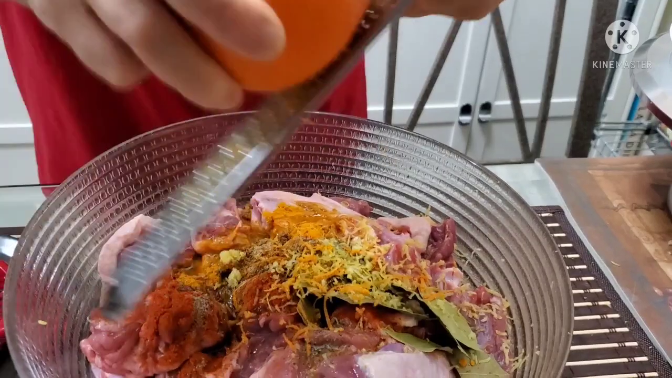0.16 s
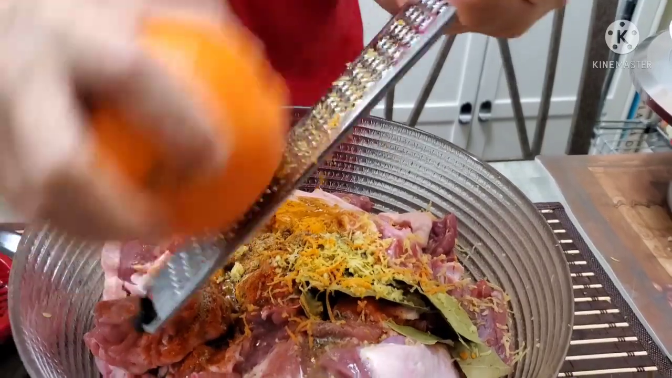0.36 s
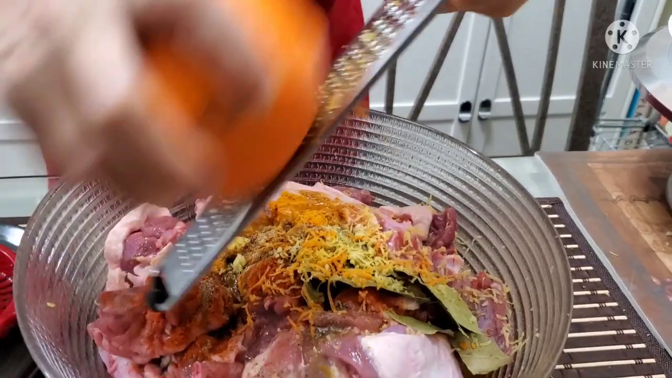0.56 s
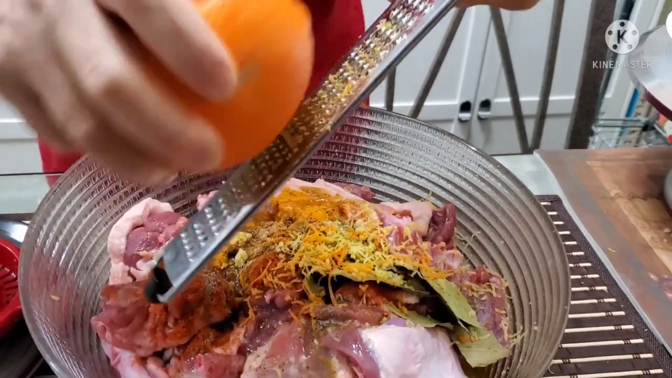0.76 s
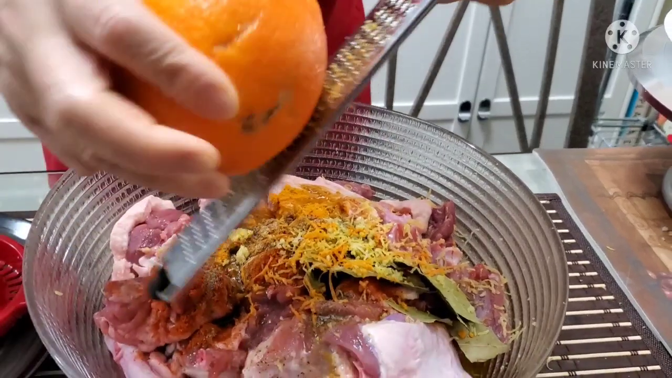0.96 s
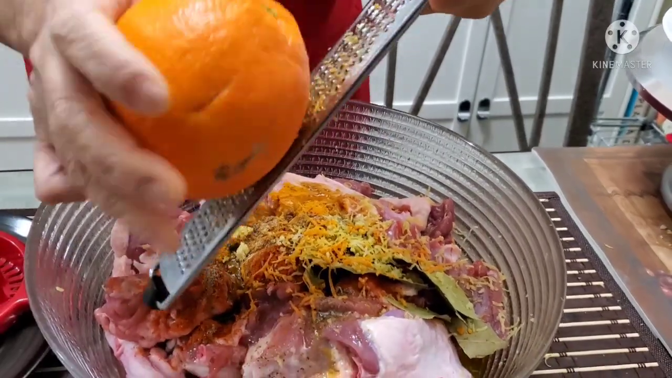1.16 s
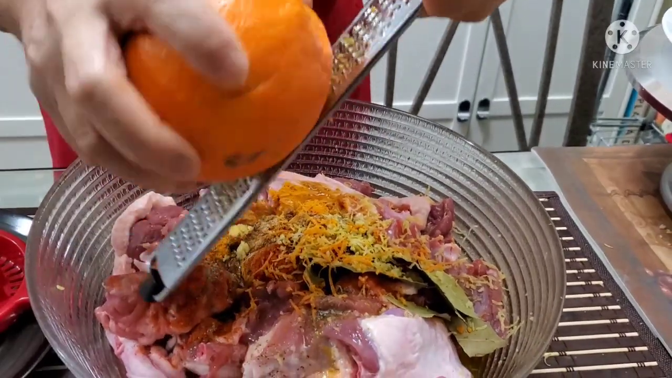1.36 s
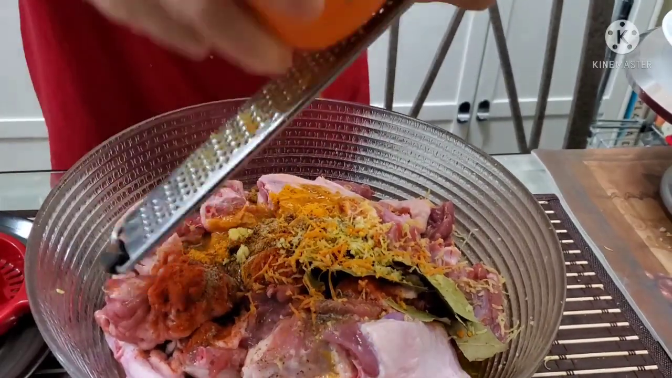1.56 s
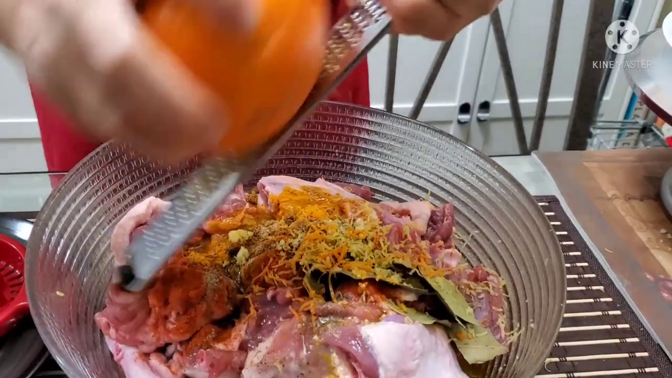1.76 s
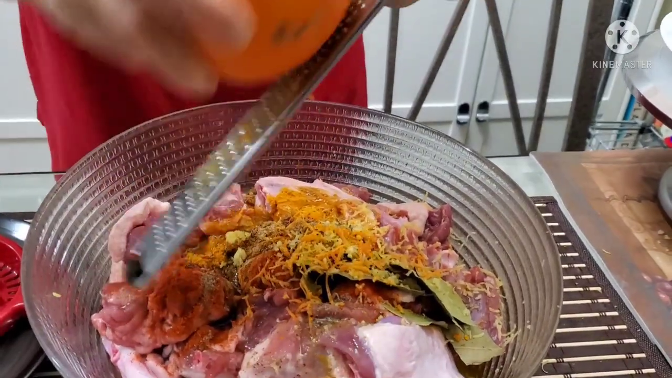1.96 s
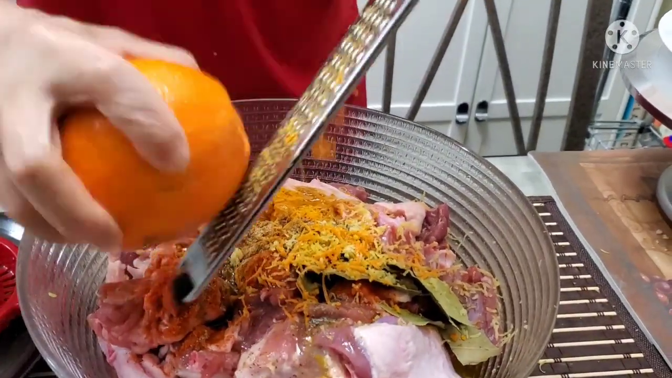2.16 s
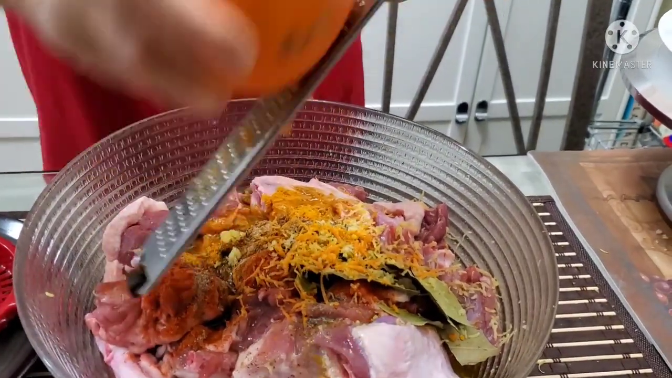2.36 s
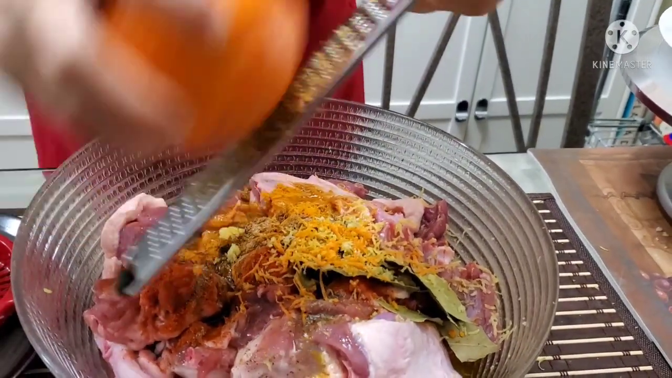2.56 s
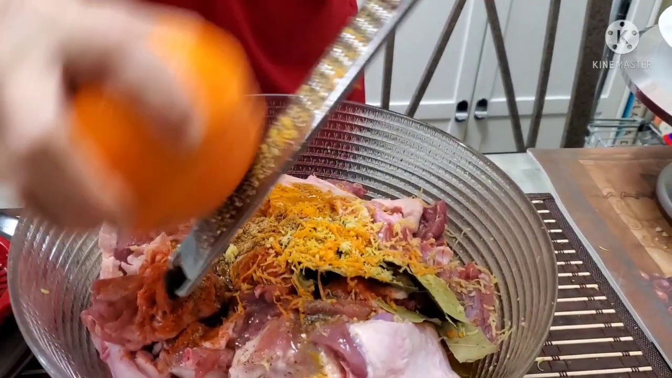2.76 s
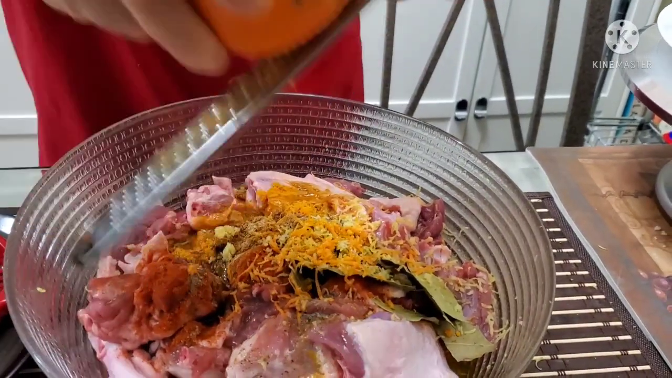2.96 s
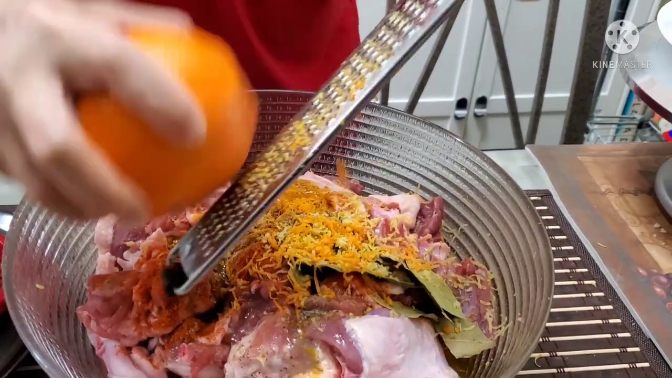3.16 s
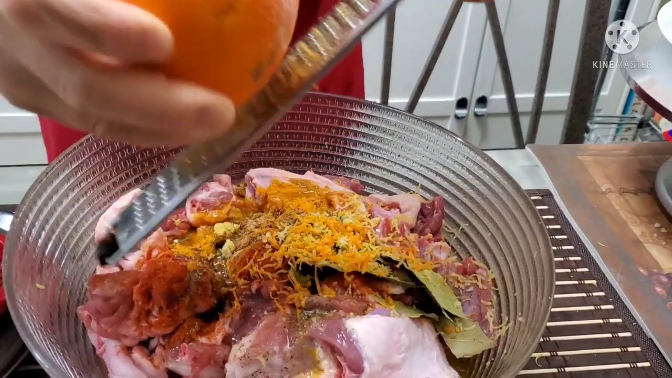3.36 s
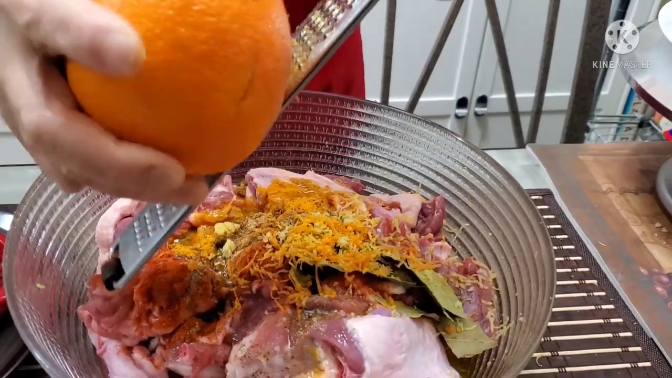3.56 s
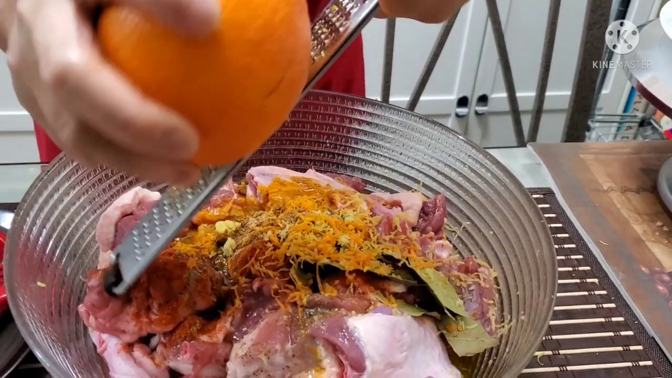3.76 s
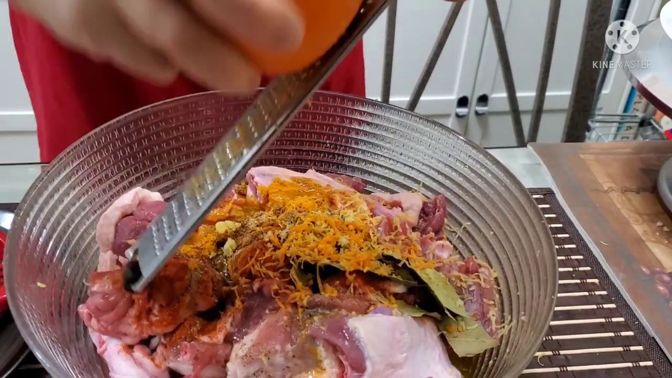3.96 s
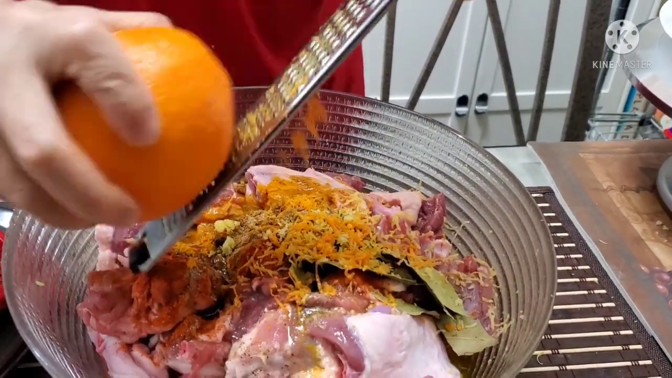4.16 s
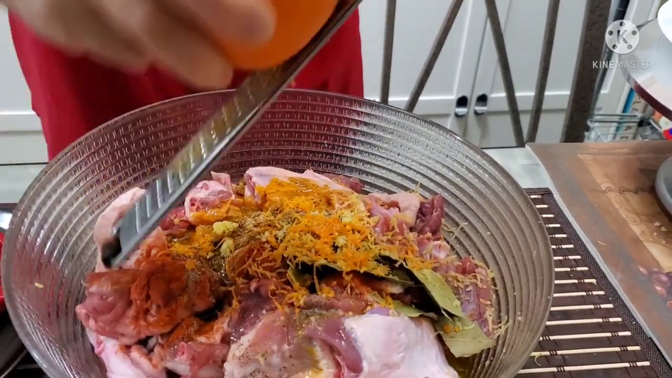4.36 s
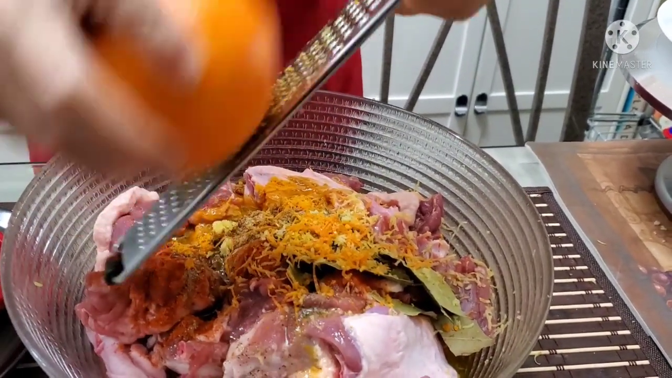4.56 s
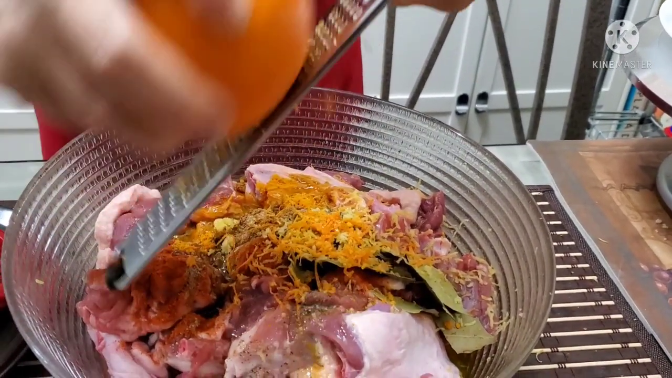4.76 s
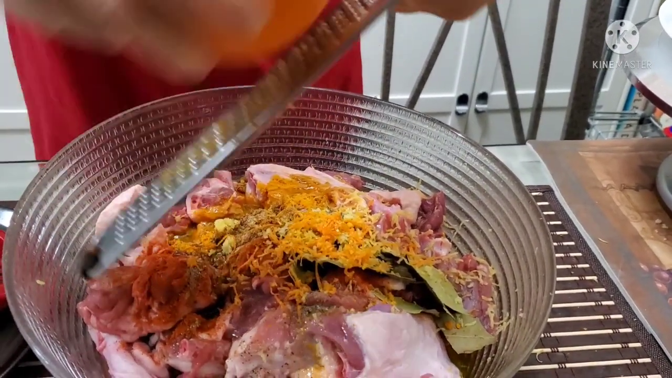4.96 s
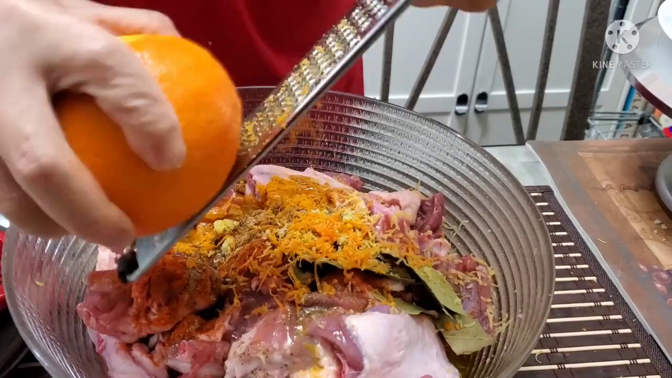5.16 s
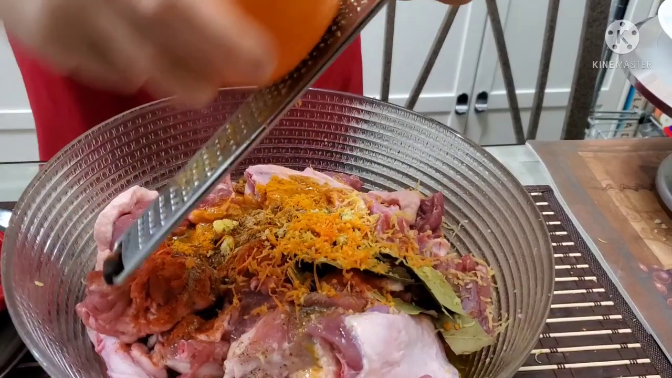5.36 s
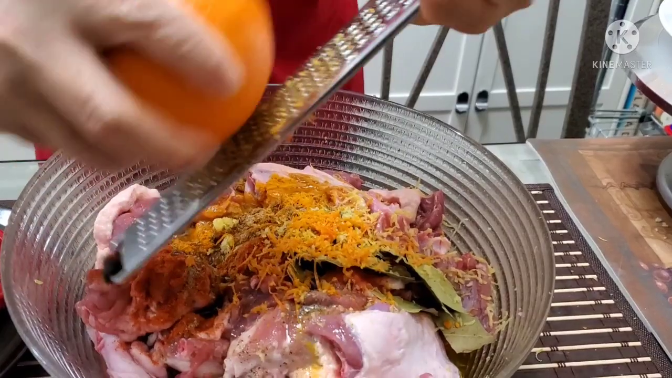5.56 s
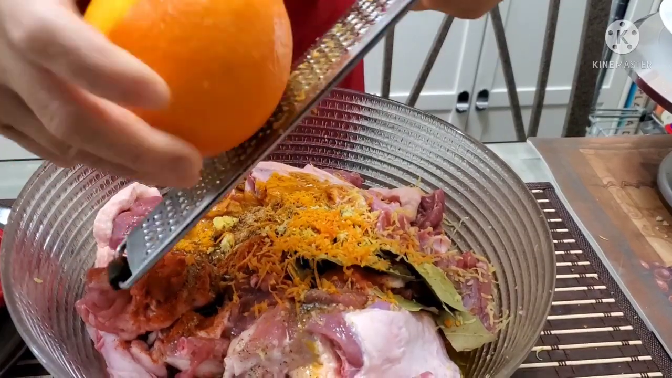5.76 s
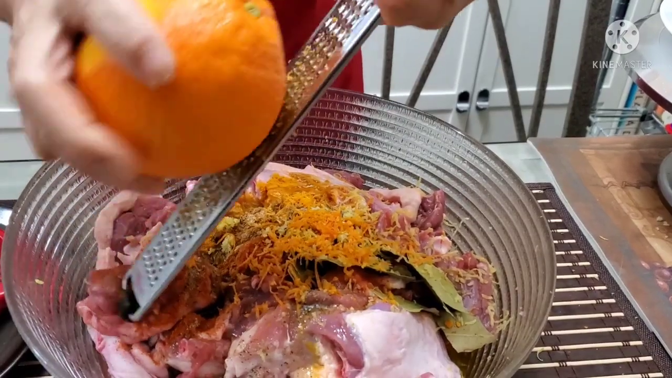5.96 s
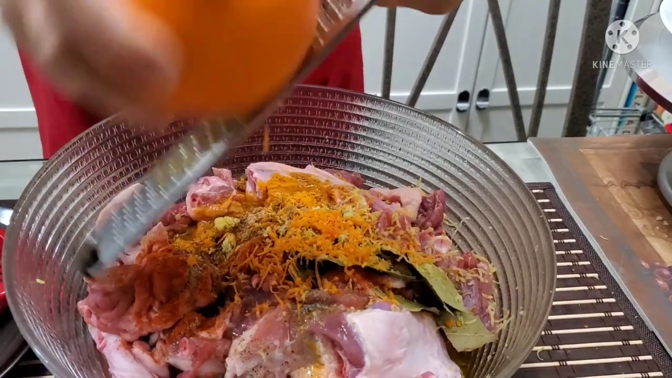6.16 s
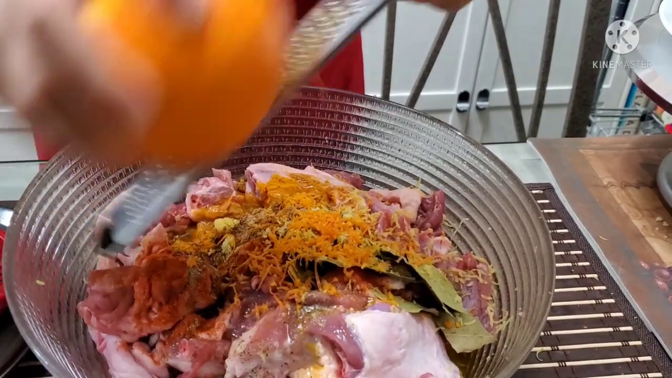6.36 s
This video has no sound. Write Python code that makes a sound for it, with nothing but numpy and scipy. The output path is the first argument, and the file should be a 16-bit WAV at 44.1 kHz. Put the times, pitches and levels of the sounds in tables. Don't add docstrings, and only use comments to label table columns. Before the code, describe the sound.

Close, crisp zesting: brisk raspy strokes of citrus peel on a metal grater, pausing twice for soft handling, in a quietly humming kitchen.

```python
import sys
import numpy as np
from scipy import signal
from scipy.fft import rfft, irfft, next_fast_len
from scipy.io import wavfile
from scipy.ndimage import uniform_filter1d

SR = 44100
rng = np.random.default_rng(int(sys.argv[2]) if len(sys.argv) > 2 else 0)


def voltage_ratio(decibels):
    exponent = np.asarray(decibels, float) / 20
    return 10 ** exponent


def to_wav(sig):
    pcm = np.clip(np.atleast_2d(sig), -1, 1) * 32767
    pcm = np.round(pcm).astype(np.int16)
    wavfile.write(sys.argv[1], SR, pcm.T)


N = 282240

# [teeth bite t/s, push t/s, ease t/s, pressure level/dB, oil spray level/dB re pressure]
STROKE_TIMES = [(-.03, .085, .028, -28, -2.5), (0.305, 0.063, 0.033, -28.5, -3),
                (0.618, 0.049, 0.045, -27.5, -2.5), (1.774, 0.085, 0.049, -32.5, -1.5),
                (2.137, 0.048, 0.05, -31, -2.5), (2.461, 0.057, 0.043, -30, -2),
                (2.774, 0.054, 0.043, -29, -2), (3.094, 0.052, 0.042, -29.5, -2.5),
                (4.152, 0.058, 0.033, -29.5, 0), (4.473, 0.064, 0.04, -30, -3.5),
                (4.788, 0.087, .045, -31.5, -4), (5.131, 0.063, 0.048, -28, -3.5),
                (5.438, 0.066, 0.052, -31, -0.5), (6.376, 0.049, 0.059, -36.5, -4.5)]
# [lower ring f/Hz, level/dB, upper ring f/Hz, level/dB, looseness level/dB]
BLADE_GRIPS = [(1202, -8.5, 1755, -18, 1), (1654, -11.5, 2400, -18.5, -1), (1604, -12.5, 1890, -20.5, 1),
               (1527, -12, 2000, -32, -1), (1480, -13.5, 2120, -11, 2.5), (1626, -5, 1170, -20, 1),
               (1661, -11.5, 2130, -10.5, -3), (1580, -17, 1900, -20.5, -5), (1552, -12.5, 4100, -27, 3.5),
               (1625, -14.5, 2300, -11.5, 0.5), (1520, -27.5, 2600, -15.5, -1.5),
               (1600, -15, 2310, -8.5, 3), (1650, -13.5, 3100, -21, 0.5), (1527, -4, 2300, -28, -16)]
# [f/Hz, width f/Hz, level/dB]
BLADE_MODES = [(742, 33, -2.5), (964, 40, 0.5), (1147, 15, 1), (1267, 41, 6.5), (1780, 42, 4),
               (2230, 40, -13.5), (2687, 27, 1.5), (3080, 23, -21.5), (3424, 60, 4.5), (5100, 150, -40.5)]
# [f/Hz, level/dB]
TEAR_COLOUR = [(410, -50), (700, -29.5), (1060, -35), (1270, 2), (1800, 4.5), (2080, 5.5), (2400, 1.5),
               (5190, -18.5), (7000, -14), (9100, -62), (15400, -120)]
# [f/Hz, level/dB]
SPRAY_COLOUR = [(3000, -34.5), (5000, -14), (6200, -5.5), (7000, -12), (8400, -4.5), (10500, -2),
                (12400, 2), (14500, 0), (15800, -6)]
# [t/s, tick level/dB, thud level/dB re tick, tick f/Hz, crack level/dB re tick]
BLADE_TOUCHES = [(0.262, -50, 0, 1075, -15.5), (0.569, -46.5, -2.5, 1600, -28.5),
                 (1.642, -51.5, 7, 1850, -19), (1.776, -36, -15.5, 2090, -20), (2.06, -41, -5.5, 2010, -17),
                 (2.418, -51.5, 12.5, 1900, -10.5), (2.691, -43, -3, 1670, -12),
                 (2.718, -38, -9, 2040, -17), (3.067, -52, 16, 1220, 0.5), (3.086, -36, -12, 1690, -32),
                 (3.301, -44, -12, 4930, -12), (3.492, -60.5, -9, 1754, -23),
                 (3.575, -61.5, 4, 1630, -12.5), (3.777, -62, -15, 1314, -30), (4.014, -40, -2, 1560, -18),
                 (4.098, -57, -23, 2210, -7), (4.111, -41, -24, 1720, -2), (4.408, -49, 8, 1230, -7.5),
                 (5.092, -40, -0.5, 2560, -24.5), (5.113, -40.5, -34, 1990, -6.5),
                 (5.394, -42, -3.5, 2250, -22), (5.609, -41, -25, 2240, -2), (5.993, -63.5, -8, 1670, 9.5),
                 (6.332, -43, -2.5, 1730, -15)]
# [start t/s, length t/s, rub level/dB, skin fizz level/dB re rub]
FINGER_RUBS = [(1.197, 0.43, -85.5, -8), (1.645, .11, -75, 3), (2.056, .03, -53.5, -4.5),
               (3.49, 0.29, -81.5, -2), (3.762, 0.2, -74, -11), (4.015, 0.083, -66, -1),
               (4.092, 0.078, -59.5, 3), (4.792, .022, -40, -5), (5.754, 0.18, -75.5, -7),
               (6.007, 0.053, -86, 22), (6.22, 0.078, -76, 2.5), (6.34, 0.022, -60, -16)]
# [f/Hz, width f/Hz, level/dB]
HISS_BANDS = [(2770, 700, -84), (11300, 700, -82)]
# [rise starts t/s, hold starts t/s, fall starts t/s, end t/s]
HISS_TIMES = [
    [1.12, 1.22, 1.45, 1.56],
    [3.62, 3.7, 3.93, 3.98],
]
# [t/s, level/dB]
ARM_JOLTS = [(.07, -51.5), (.28, -54.5), (0.702, -51.5), (1.798, -53.5), (1.91, -51.5), (2.22, -51),
             (2.43, -53.5), (2.62, -58.5), (2.89, -61), (3.111, -50.5), (4.03, -67), (4.23, -53),
             (4.57, -49), (4.8, -53.5), (4.93, -58.5), (5.12, -51.5), (5.21, -52), (5.45, -57),
             (5.6, -61.5), (6.36, -56)]
# [t/s, level/dB]
HUM_LEVEL = [(0.0, -59.5), (0.1, -55), (1.3, -62.5), (1.35, -56.5), (2.25, -61.5), (2.89, -56),
             (2.94, -67.5), (3.06, -56), (3.62, -60), (5.6, -55), (5.74, -60), (6.4, -57)]
# [f/Hz, width f/Hz, level/dB]
HUM_PARTIALS = [(195.6, 3, 0.5), (390, 0.94, -12), (57, 2.7, -13.5)]
# [f/Hz, level/dB]
AIR_COLOUR = [(20, -38.5), (50, -11.5), (160, -4.5), (420, -8.5), (700, -27.5), (3080, -39.5), (7310, -48),
              (14000, -38)]
# [f/Hz, likeness, 1 = same]
AIR_LIKENESS = [(60, 0.53), (200, 1), (350, 0.15), (700, 0.12), (2000, 0.44), (15000, .1)]
# [f/Hz, t60 t/s]
KITCHEN_DECAY = [(500, 0.6), (1300, 0.53), (3500, 0.45), (9000, 0.36)]
BLADE_LEADS = [2, 4, 6, 6, 8]
# [f/Hz, left minus right level before scaling/dB]
PORT_BALANCE = [(60, -15), (110, 2), (200, -5.5), (380, 25.5), (700, 3), (1290, -7), (2380, -6),
                (4400, -29.5), (8120, -8.5), (15000, 9.5)]

REGRIP_S = .045
LAND_S, LAND_DB = 0.02, -25.5
PUSH_DB, PUSH_CURVE, EASE_DB, EASE_CURVE = -17.5, 2.1, -6.5, 1.7
LIFT_S, LIFT_DB = 0.02, -9.5
TRAIL_S, TRAIL_DB = 0.097, -13
SPRAY_STEADY, SPRAY_LIFT_DB = 0.15, -9.5
FLEX_DB, FLEX_GAIN_DB, FLEX_STEADY, FIRM_DB = -22, 19.5, 1, -28
BITE_DB, BITE_STEADY = -5.5, .15
GRASP, SLIDE_DB = 0.11, -8
JOLT_RISE_S, JOLT_FALL_S, REST_DB = 0.024, 0.045, -65.5
AIR_DB = -60
EDGE_HZ = 15780


def evened(x):
    return x / np.sqrt(np.mean(x ** 2) + 1e-20)


def read(points, hz):
    f, value = np.transpose(points)
    return np.interp(np.log(hz + 1), np.log(f + 1), value)


def colour(x, points, power=1):
    length = x.shape[-1]
    size = next_fast_len(length + 2048)
    gain = voltage_ratio(power * read(points, np.fft.rfftfreq(size, 1 / SR)))
    return irfft(rfft(x, size) * gain, size)[..., :length]


def band(x, lo_hz, hi_hz):
    return signal.sosfilt(signal.butter(2, [lo_hz, hi_hz], "band", fs=SR, output="sos"), x)


def resonate(x, hz, width):
    turn = np.exp(2j * np.pi * np.cumsum(hz * np.ones(len(x))) / SR)
    r = np.exp(-np.pi * width / SR)
    return 2 * (turn * signal.lfilter([1 - r], [1, -r], x / turn)).real


def clicks(per_s, spread_db):
    size = voltage_ratio(spread_db * np.minimum(rng.exponential(1, N), 4)) * rng.choice([-1., 1.], N)
    return evened(size * (rng.random(N) < per_s / SR))


def rasp():
    force, spraying, flexing, biting = voltage_ratio(-3) * stroke_controls()
    chance = rng.standard_normal(N)
    rows = voltage_ratio(1.1 * evened(band(chance, 60, 410)))
    pockets = voltage_ratio(1.3 * evened(band(chance, 14, 55)))
    tears = dimpled(rows * clicks(7000, 2.3))
    body = evened(colour(tears, TEAR_COLOUR))
    bite = evened(band(band(tears, 1800, 6500), 1700, 6000))
    spray = evened(colour(pockets * rows ** .7 * clicks(16000, 2.5), SPRAY_COLOUR))
    flex = evened(band(band(tears, 480, 1300), 420, 2100))

    steel = blade(BLADE_MODES)
    ringing = voltage_ratio(-12.5) * signal.oaconvolve(force * tears, steel / np.linalg.norm(steel))[:N]
    grip_starts = np.transpose(STROKE_TIMES)[0] - REGRIP_S
    stroke = np.searchsorted(grip_starts, np.arange(N) / SR).clip(1) - 1
    low_hz, low_db, high_hz, high_db, loose_db = np.transpose(BLADE_GRIPS)[:, stroke]
    for hz, db, width in ((low_hz, low_db, 15), (high_hz, high_db, 16)):
        mode = resonate(voltage_ratio(db + 0.5) * force * tears, hz, width)
        ringing += mode * np.sqrt(SR / (2 * np.pi * width))
    out = ringing + force * body + spraying * spray
    return out + voltage_ratio(loose_db - 9.0) * flexing * flex + voltage_ratio(-6.0) * biting * bite


def stroke_controls():
    t, out = np.arange(N) / SR, np.zeros((4, N))
    for s, push, ease, db, spray_db in STROKE_TIMES:
        end = s + push + ease + LIFT_S + TRAIL_S
        near = slice(max(round((s - LAND_S) * SR), 0), round(end * SR))
        since = t[near] - s
        landing = (-since / LAND_S).clip(0, 1)
        held_db = PUSH_DB * (1 - since / push).clip(0, 1) ** PUSH_CURVE
        held_db += EASE_DB * ((since - push) / ease).clip(0, 1) ** EASE_CURVE
        lift = ((since - push - ease) / LIFT_S).clip(0, 1)
        trail = ((since - push - ease - LIFT_S) / TRAIL_S).clip(0, 1)
        force_db = db + held_db + LAND_DB * landing + LIFT_DB * lift + TRAIL_DB * trail
        force = voltage_ratio(force_db) * np.sqrt(1 - trail)
        along = (since / (push + ease)).clip(0, 1)
        spraying_db = spray_db - SPRAY_STEADY * held_db + SPRAY_LIFT_DB * lift
        flexing_db = FLEX_DB + FLEX_GAIN_DB * along - FLEX_STEADY * (db - FIRM_DB)
        biting_db = BITE_DB - BITE_STEADY * held_db
        out[:, near] += force * voltage_ratio([0 * since, spraying_db, flexing_db, biting_db])
    return out


def dimpled(x, patchy_db=2.0):
    hz, t, z = signal.stft(x, nperseg=256, noverlap=192)
    noise = rng.standard_normal(z.shape[::-1]).T
    patches = evened(uniform_filter1d(uniform_filter1d(noise, 3, 0), 14, 1))
    return evened(signal.istft(z * voltage_ratio(patchy_db * patches), nperseg=256, noverlap=192)[1][:N])


def blade(modes, damping=1):
    t = np.arange(6000) / SR
    out = np.zeros(len(t))
    for hz, width, db in modes:
        decay = np.exp(-np.pi * width * damping * t)
        out += voltage_ratio(db) * np.sqrt(width) * decay * np.sin(2 * np.pi * hz * t)
    return out


def touches():
    out, t = np.zeros(N + 6000), np.arange(6000) / SR
    chime = blade(BLADE_MODES, damping=7.5)
    chime /= abs(chime).max()
    for s, db, thud_db, hz, crack_db in BLADE_TOUCHES:
        noise = rng.standard_normal(len(t))
        crack = voltage_ratio(crack_db + 5.0 - 60 * t / 0.027) * evened(colour(noise, SPRAY_COLOUR, 0.93))
        tick = np.sin(2 * np.pi * hz * t) + 0.38 * evened(resonate(noise, hz, 1200))
        ring = voltage_ratio(4 - 60 * t / 0.0094) * tick
        onset = 1 - np.exp(-t / 0.002)
        out[round(s * SR):][:len(t)] += voltage_ratio(db + 1.0) * onset * (crack + ring + voltage_ratio(4.0) * chime)
    return out[:N]


def thuds():
    out, t = np.zeros(N + 6000), np.arange(6000) / SR
    hz = 70 + 190 * np.exp(-t / .007)
    envelope = voltage_ratio(-60 * t / 0.077) * (1 - np.exp(-t / 0.0016))
    push = -envelope * np.sin(2 * np.pi * np.cumsum(hz) / SR)
    for s, db, thud_db, *_ in BLADE_TOUCHES:
        out[round((s - .002) * SR):][:len(t)] += voltage_ratio(db + thud_db + 0.5) * push
    return out[:N]


def fingers():
    rub = evened(band(band(clicks(4000, 2.2), 600, 3600), 1000, 3900))
    fizz = evened(band(colour(clicks(5850, 4), SPRAY_COLOUR), 8500, 15000))
    t, out = np.arange(N) / SR, np.zeros(N)
    for s, length, rub_db, fizz_db in FINGER_RUBS:
        done = ((t - s) / length).clip(0, 1)
        hold = np.minimum(np.minimum(done, 1 - done) / GRASP, 1) * voltage_ratio(SLIDE_DB * done)
        out += hold * voltage_ratio(rub_db) * (rub + voltage_ratio(fizz_db) * fizz)
    return out


def faint_hisses():
    out = np.zeros(N)
    for times, (hz, width, db) in zip(HISS_TIMES, HISS_BANDS):
        slide = np.interp(np.arange(N) / SR, times, [0, 1, 1, 0])
        hiss = resonate(resonate(clicks(3000, 2.3), hz, width), hz, width)
        out += slide * voltage_ratio(db) * evened(hiss)
    return out


def shake():
    t = np.arange(N) / SR
    level = voltage_ratio(REST_DB) * np.ones(N)
    for s, db in ARM_JOLTS:
        level += voltage_ratio(db) * np.exp(-((t - s) / np.where(t < s, JOLT_RISE_S, JOLT_FALL_S)) ** 2)
    noise = rng.standard_normal(N)
    deep = evened(band(band(noise, 44, 120), 30, 110))
    return level * (deep + voltage_ratio(-4) * evened(band(noise, 76, 360)))


def hum():
    t = np.arange(N) / SR
    out = np.zeros(N)
    for hz, width, line_db in HUM_PARTIALS:
        noise = rng.standard_normal(N)
        fuzz = evened(resonate(resonate(noise, hz, width * 3.1), hz, width * 3.1))
        out += voltage_ratio(line_db) * evened(np.sin(2 * np.pi * hz * t) + 0.45 * fuzz)
    return voltage_ratio(np.interp(t, *np.transpose(HUM_LEVEL))) * out


def air():
    frames, hz = N // 256 + 5, np.fft.rfftfreq(1024, 1 / SR)
    a, b, c, d, patches = rng.standard_normal((frames, 513, 5)).T
    patches = evened(uniform_filter1d(uniform_filter1d(patches, 12, 0), 14, 1))
    same = np.clip(read(AIR_LIKENESS, hz), -1, 1)[:, None]
    left = a + 1j * b
    right = same * left + np.sqrt(1 - same ** 2) * (c + 1j * d)
    z = np.array([left, right]) * voltage_ratio(read(AIR_COLOUR, hz)[:, None] + 0.5 * patches)
    return voltage_ratio(AIR_DB) * evened(signal.istft(z, nperseg=1024, noverlap=768)[1][:, :N])


def kitchen(x, early_db=-4, late_db=-11):
    size = SR // 2
    taps = np.zeros((2, size))
    at = np.arange(300, size - 20, 20) + rng.integers(0, 20, (2, (size - 301) // 20))
    np.put_along_axis(taps, at, rng.choice([-1., 1.], at.shape), 1)
    hz, t, z = signal.stft(taps, SR, nperseg=256)
    decay = voltage_ratio(-60 * t / read(KITCHEN_DECAY, hz)[:, None])
    tail = signal.istft(z * decay, SR, nperseg=256)[1][:, :size]
    tail /= np.linalg.norm(tail[0])
    out = voltage_ratio(late_db) * signal.fftconvolve(x[None], tail, axes=1)[:, :N]

    share = uniform_filter1d(rng.standard_normal((len(BLADE_LEADS), N)), 90) ** 2
    share /= np.sqrt((share ** 2).sum(0))
    for part, lead in zip(x * share, BLADE_LEADS):
        path = np.zeros((2, 500))
        at = rng.integers(12, 500, (2, 12))
        np.put_along_axis(path, at, rng.choice([-1., 1.], at.shape) * np.exp(-at / 250), 1)
        path *= voltage_ratio(early_db) / np.linalg.norm(path, axis=1, keepdims=True)
        path[[0, 1], [0, lead]] += 1
        out += signal.oaconvolve(part[None], path, axes=1)[:, :N]
    return out


def scene():
    close = kitchen(rasp() + touches() + fingers() + faint_hisses())
    table = (shake() + thuds()) * voltage_ratio([[-1.5], [1.5]])
    return close + table + hum() * voltage_ratio([[-.4], [.4]]) + air()


def band_limit(x):
    return signal.sosfilt(signal.butter(12, 15850, fs=SR, output="sos"), x)


def record(dry):
    ports = np.array([colour(dry[0], PORT_BALANCE, 0.033), colour(dry[1], PORT_BALANCE, -0.19)])
    ports = signal.sosfilt(signal.butter(2, 36, "high", fs=SR, output="sos"), ports)
    edge = signal.firwin(1023, EDGE_HZ, window=("kaiser", 9), fs=SR)
    ports = signal.oaconvolve(ports, edge[None], "same")
    return band_limit(ports)


dry = scene()
out = record(dry)
to_wav(out)
```